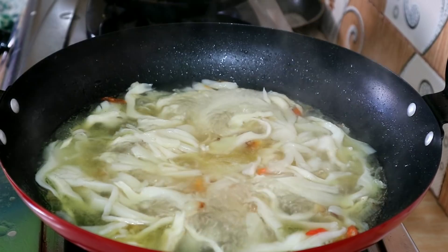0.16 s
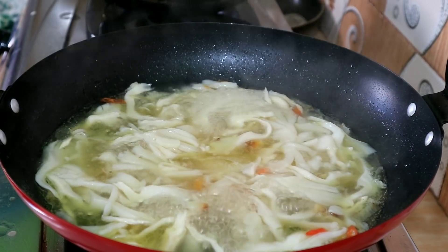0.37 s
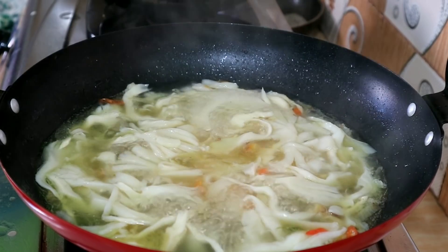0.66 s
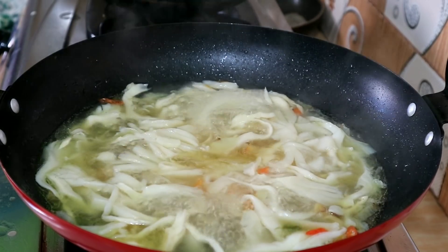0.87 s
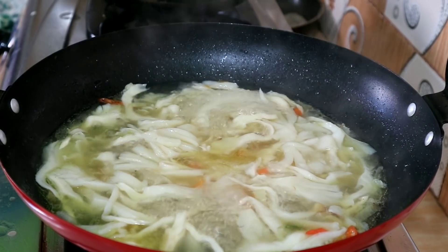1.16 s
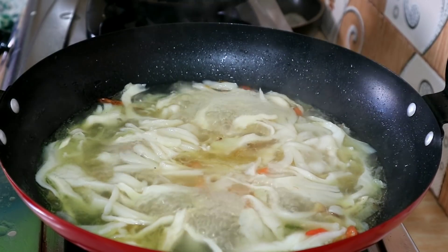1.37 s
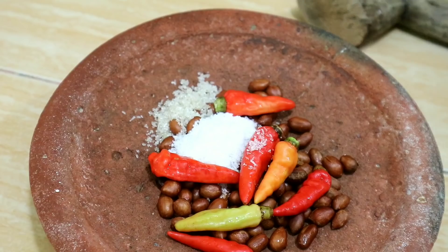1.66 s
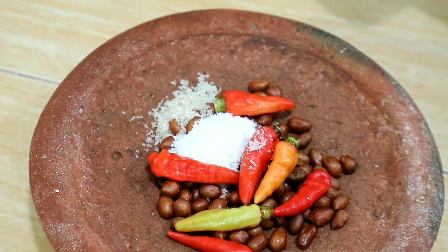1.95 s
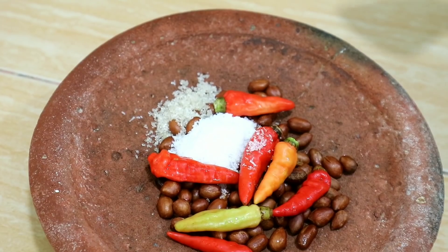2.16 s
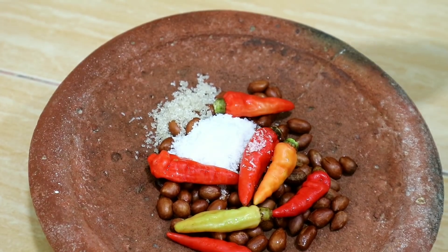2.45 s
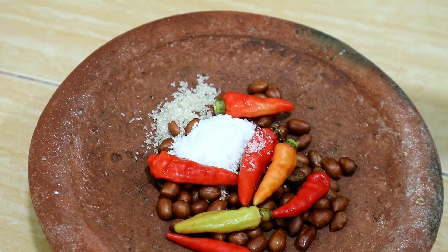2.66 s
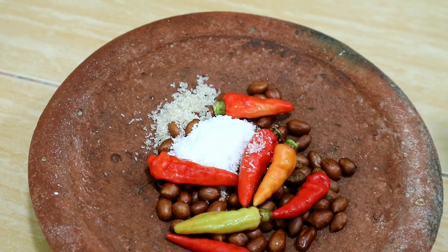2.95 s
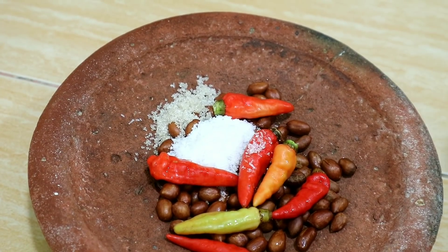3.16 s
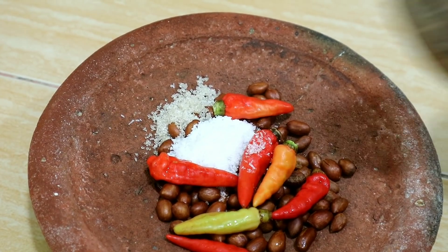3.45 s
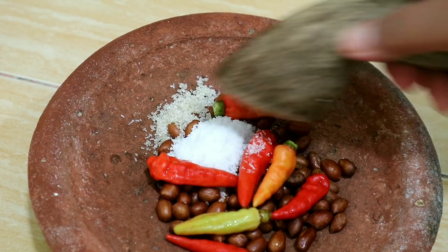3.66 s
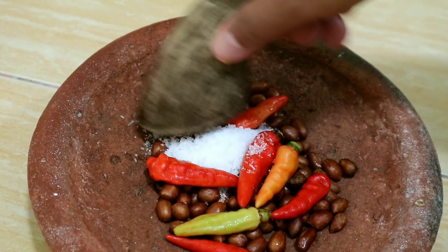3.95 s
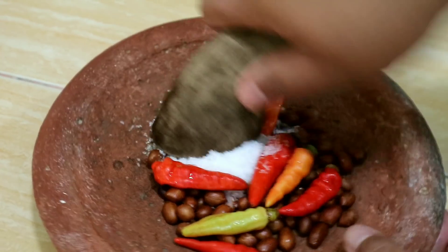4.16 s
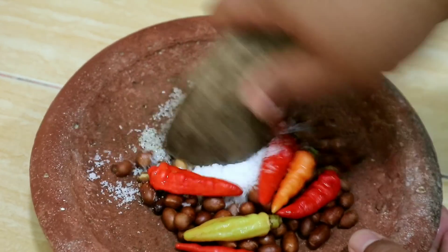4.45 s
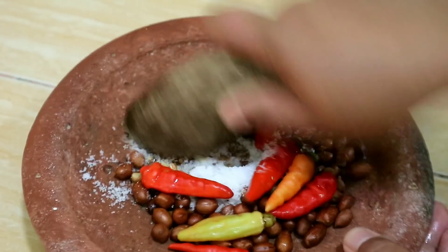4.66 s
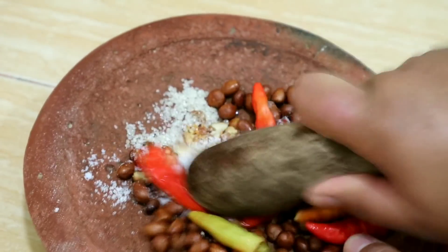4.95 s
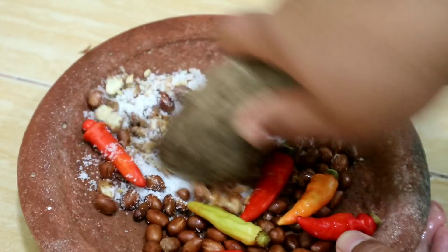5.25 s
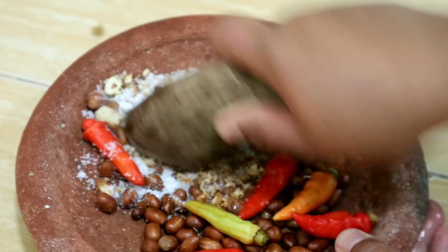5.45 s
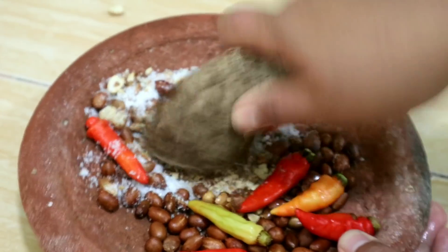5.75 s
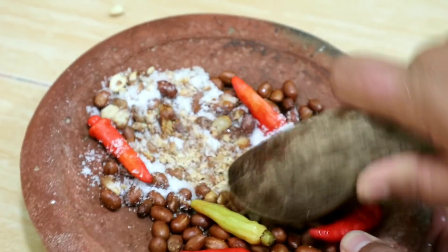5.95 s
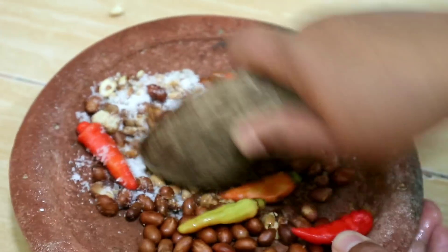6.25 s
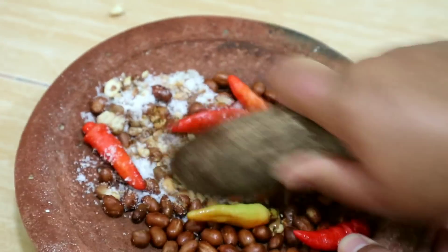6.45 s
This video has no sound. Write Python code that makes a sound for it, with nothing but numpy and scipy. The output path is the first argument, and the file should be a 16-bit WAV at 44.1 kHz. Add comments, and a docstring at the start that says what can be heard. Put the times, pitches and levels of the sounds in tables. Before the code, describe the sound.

From 0 to 1.7 seconds a wok of noodles simmers faintly: a low, uneven throbbing boil, soft steam hiss and scattered bubble pops, one sharper near 1.1. At 1.7 the simmer cuts out and water swells in quickly, a steady bright splash like a running tap into a sink, full of fine drops, with brief bubbly gushes especially between 1.9 and 3.3. Around 4.2 a pestle starts working in a clay dish, close and much louder than the water. Short gritty pushes, each under a tenth of a second, come irregularly, with hard, dry nut cracks; the strongest cluster is near 4.6, with more around 5.1 to 5.3 and 5.6 to 5.9. The clay rings briefly, salt fizzes finely, and the small tiled kitchen adds a short echo. Grinding grows sparser after 5.9, continuing to the end at about 6.7 over unbroken water.

```python
"""A wooden pestle grinds peanuts, salt and chillies in a clay dish: short gritty pushes and cracking nuts,
random fractures and snaps driving the dish's resonances. Behind it noodles simmer in a wok, shaped noise
with a few pops; then water splashes steadily, as from a running tap: coloured drops and noise with gushes."""
import sys
import numpy as np
from scipy import signal
from scipy.fft import rfft, irfft, next_fast_len
from scipy.io import wavfile
from scipy.ndimage import uniform_filter1d, map_coordinates

SR = 44100
rng = np.random.default_rng(int(sys.argv[2]) if len(sys.argv) > 2 else 0)


def generate_wav(signal):
    """Clip the signal to [-1, 1] and save it as 16-bit WAV at the path in sys.argv[1]."""
    frames = np.transpose(np.atleast_2d(signal))
    scaled = np.clip(frames, -1, 1) * 32767
    pcm = np.round(scaled).astype(np.int16)
    wavfile.write(sys.argv[1], SR, pcm)


N = 291501

WATER_START_S = 1.686  # the wok gives way to the water

# Spectrum of the coarse splash. Each row: frequency in Hz, relative level in dB per Hz.
SPLASH_COLOUR = [(25, -48), (70, -40), (160, -19), (230, -23), (310, -16.5), (420, -22), (620, -13),
                 (1050, -11), (1600, -8), (1900, -5.5), (2300, -1), (3000, -5), (4500, -20.5), (9000, -51)]
# Pushes of the pestle. Each row: start in s, end in s, level in dB (both ears' power summed, before the room),
# brightness in dB, place on the dish (-1 to 1).
PUSHES = [(4.17, 4.226, -27.5, -6.5, 0.18), (4.42, 4.489, -20, -1, 0.089), (4.553, 4.613, -18, -4, 1),
          (4.732, 4.807, -19, -1.5, 0.15), (4.851, 4.881, -21.5, 3.5, .7), (5.092, 5.14, -22.5, 1.5, 0.3),
          (5.146, 5.208, -16, 0.5, -0.18), (5.264, 5.315, -18.3, -2, 0.25), (5.379, 5.424, -20, -0.5, 0.18),
          (5.47, 5.56, -19.5, -1, -0.49), (5.553, 5.607, -17, 4.5, 0.43), (5.671, 5.712, -24, -6.5, -0.24),
          (5.74, 5.815, -23, 0.5, -.65), (5.816, 5.897, -21.5, -1.5, -0.27), (5.956, 5.99, -25.5, 6, -.2),
          (6.163, 6.193, -25, -7, -0.46), (6.243, 6.285, -24, 0.5, 0.28), (6.291, 6.382, -21, -0.5, -0.33),
          (6.468, 6.542, -27.5, -3.5, -0.048)]


def amp(db):
    """Decibels to gain."""
    return 10 ** (np.asarray(db) / 20)


def unit(x):
    """Scale to rms 1."""
    return x / np.sqrt(np.mean(x ** 2) + 1e-20)


def along(points, hz):
    """Read (Hz, value) points on a log frequency axis."""
    f, v = np.transpose(points)
    return np.interp(np.log(hz + 1), np.log(f + 1), v)


def wobble(rate_hz, size=N):
    """Smooth random curve through rate_hz knots a second."""
    knots = rng.standard_normal(int(size * rate_hz / SR) + 4)
    return map_coordinates(knots, [np.arange(size) * rate_hz / SR])


def sides(pan_db):
    """Left and right gains for a left-minus-right level."""
    pan_db = np.atleast_1d(pan_db)
    return amp(np.array([pan_db, -pan_db]) / 2)


def add(track, s, sound):
    """Mix a sound into a track at s seconds."""
    part = track[..., max(round(s * SR), 0):][..., :sound.shape[-1]]
    part += sound[..., :part.shape[-1]]


def filtered(x, response):
    """Multiply the spectrum of x by a function of frequency."""
    n = x.shape[-1]
    m = next_fast_len(n + SR // 4)
    return irfft(rfft(x, m) * response(np.fft.rfftfreq(m, 1 / SR)), m)[..., :n]


def band(x, centre_hz, octaves):
    """Keep a bell-shaped band about a pitch."""
    return filtered(x, lambda hz: np.exp(-.5 * (np.log2((hz + 1) / centre_hz) / octaves) ** 2))


def grains(shape, rate_hz, spread_db):
    """Random impulses of either sign, rate_hz a second, their sizes spread in dB."""
    hit = rng.random(shape) < rate_hz / SR
    sign = np.sign(rng.standard_normal(shape))
    size = amp(spread_db * np.clip(rng.standard_normal(shape), -2, 2))
    return unit(hit * sign * size)


def stereo(pair, colour, alike, phase, pan):
    """Colour two unrelated signals and place them between the ears by likeness, phase and level."""
    def ears(hz):
        turn = np.arccos(np.clip(along(alike, hz), -1, 1)) / 2
        lead = np.exp(.5j * along(phase, hz) * np.array([[1], [-1]]))
        mix = np.array([[np.cos(turn), np.cos(turn)], [np.sin(turn), -np.sin(turn)]])
        return mix * lead * sides(along(pan, hz)) * amp(along(colour, hz))
    return unit(filtered(pair[:, None], ears).sum(0))


def patchy(x, depth_db):
    """Random patches of gain in time and frequency."""
    z = signal.stft(x, nperseg=256)[2]
    field = uniform_filter1d(rng.standard_normal(z.shape[1:]), size=5, axis=0)
    field = uniform_filter1d(field, size=9, axis=1)
    return signal.istft(z * amp(depth_db * unit(field)), nperseg=256)[1][:, :N]


def kitchen(x, wet_db):
    """A sound with the tiled room's short answer, decaying noise drawn anew per call and ear."""
    # Each row: frequency in Hz, t60 in s.
    decay = [(200, 0.41), (2000, 0.48), (10000, 0.097)]
    hz, t, z = signal.stft(rng.standard_normal((2, SR // 5)), SR, nperseg=256)
    tail = signal.istft(z * amp(-60 * t / along(decay, hz)[:, None]), SR, nperseg=256)[1]
    wet = amp(wet_db) * tail / np.linalg.norm(tail[0])
    response = np.pad(wet, ((0, 0), (SR // 300, 0)))
    response[:, 0] = 1  # direct sound
    return signal.fftconvolve(x, response, axes=1)


def boil():
    """Steam bubbles throb under the noodles: low noise with slow wavering and large heaves."""
    # Boil spectrum. Each row: frequency in Hz, relative level in dB per Hz.
    colour = [(25, -32), (60, -38), (100, -14), (150, -3), (200, -6), (270, -15), (600, -54), (1500, -90)]
    # Large steam bubbles heaving. Each row: centre in s, lift above the boil in dB.
    heaves = [(.5, 6), (.72, 3), (1.1, 4.5), (1.23, 5), (1.42, 1)]
    heave_sigma_s = 0.041
    now = np.arange(N) / SR
    level_db = -49.5 + 1.6 * wobble(15.95)
    for s, lift_db in heaves:
        level_db += lift_db * np.exp(-.5 * ((now - s) / heave_sigma_s) ** 2)
    noise = rng.standard_normal((2, N))
    return amp(level_db) * stereo(noise, colour, [(150, 0.94)], [(150, -1.03)], [(150, -7.0)])


def steam():
    """Steam hisses at the surface: noise and sparse impulses in random patches."""
    # Steam spectrum. Each row: frequency in Hz, relative level in dB per Hz.
    colour = [(25, -29), (200, -18), (330, -8), (450, -11.5), (700, -10.5), (1200, -9.5), (1450, -13.5),
              (2700, -15), (5000, -19), (10800, -23.5), (15000, -39)]
    noise = rng.standard_normal((2, N)) + .5 * grains((2, N), rate_hz=900, spread_db=4.5)
    fizz = patchy(noise, depth_db=2.0)
    alike = [(400, 0.086), (1800, 0.3), (4000, .12)]
    pan = [(300, -4.0), (700, -3.0), (9000, -2.5)]
    level_db = -43.5 + wobble(8)
    return amp(level_db) * stereo(fizz, colour, alike, [(1000, 0.34)], pan)


def pops():
    """Bubbles burst on the broth: decaying noise in a band about each pitch."""
    # Each row: start in s, peak level in dB (before panning), pitch in Hz, t60 in s.
    bursts = [(.002, -28.5, 2690, 0.18), (.146, -33.5, 140, .12), (.53, -38, 1400, 0.11),
              (.812, -37.5, 397, 0.096), (.85, -36, 1170, .16), (.965, -34.5, 360, 0.064),
              (.984, -31, 1600, .09), (1.103, -23.5, 1580, 0.01), (1.189, -33.5, 3000, 0.39),
              (1.38, -32, 1550, .05), (1.642, -34.5, 350, .17), (1.646, -29.5, 780, .14),
              (1.655, -30, 2800, .12)]
    out, t = np.zeros((2, N)), np.arange(SR // 6) / SR
    for s, peak_db, hz, t60_s in bursts:
        noise = rng.standard_normal(len(t)) + 2.3 * rng.standard_normal((2, len(t)))  # part shared by the ears
        pop = band(noise * amp(-60 * t / t60_s), hz, octaves=0.49)
        add(out, s, amp(peak_db) * pop / np.abs(pop).max())
    return out * sides(-5.0)


def wok():
    """Boil, steam and pops, faded out as the water starts."""
    fade_s = 0.017
    fade = np.clip((WATER_START_S - np.arange(N) / SR) / fade_s + 1, 0, 1)
    return (boil() + steam() + pops()) * fade


def drops(rate_hz, patchy_db):
    """Crackling single drops over a noise blur of far ones, in random patches."""
    # Power share of single drops. Each row: frequency in Hz, share (0 to 1).
    drop_share = [(500, 0.05), (1100, 0.19), (2000, 0.77), (4000, 0.46), (7000, 0.2), (12000, 0.35)]
    share = lambda hz: np.clip(along(drop_share, hz), 0, 1)
    near = filtered(grains((2, N), rate_hz, spread_db=2.5), lambda hz: np.sqrt(share(hz)))
    far = filtered(rng.standard_normal((2, N)), lambda hz: np.sqrt(1 - share(hz)))
    return patchy(near + far, depth_db=patchy_db)


def basin(x):
    """The hollow of the sink lifts a few narrow bands of the splashing."""
    # Each row: centre in Hz, width in Hz, lift in dB.
    hollows = [(359, 16, 5.5), (377, 18, 6), (456, 15, 11), (714, 18, 6), (820, 22, 0), (1790, 35, 0)]
    def lift(hz):
        return amp(sum(db / (1 + (2 * (hz - centre) / width) ** 2) for centre, width, db in hollows))
    return filtered(x, lift)


def stream():
    """Thousands of drops: coarse splash through the basin and finer spray, both swelling in."""
    # Spray spectrum. Each row: frequency in Hz, relative level in dB per Hz.
    spray_colour = [(100, -37.5), (1000, -23.5), (2000, -12), (3000, -3.5), (3650, -2), (4500, -4.5),
                    (5100, -9), (6500, -14.5), (8000, -19), (10000, -25.5), (12500, -34.5), (15000, -44.5)]
    # Between the ears. Each row: frequency in Hz, likeness (0 to 1).
    alike = [(100, 0.5), (650, 0.78), (1400, 0.7), (2500, 0.12), (5000, 0.15), (9000, 0.2)]
    # Each row: frequency in Hz, left's phase lead in radians.
    phase = [(100, -0.6), (350, 0.53), (1000, 1.19), (1400, 1.5), (2500, 2.5), (8000, 2.5)]
    # Each row: frequency in Hz, left minus right in dB.
    pan = [(150, -1.5), (400, -5), (800, 0), (2000, -2), (4000, -1), (10000, -1)]
    # The stream slowly eases and gains strength. Each row: time in s, level change in dB.
    strength = [(1.8, 0.3), (2.3, 0.3), (3.1, 0), (3.55, -.4), (4.2, 1.5), (5.0, 0.95), (6.4, 1.1)]
    age_s = np.maximum(np.arange(N) / SR - WATER_START_S, 0)
    flutter_db, wander_db = 0.59, 0.4  # fast and common; slow and per layer
    stream_db = np.interp(WATER_START_S + age_s, *np.transpose(strength)) + flutter_db * wobble(55)

    def swell(db, time_constant_s):
        return amp(db + stream_db + wander_db * wobble(9)) * (1 - np.exp(-age_s / time_constant_s))

    splash = stereo(drops(rate_hz=1700, patchy_db=0.93), SPLASH_COLOUR, alike, phase, pan)
    spray = stereo(drops(rate_hz=2600, patchy_db=1.4), spray_colour, alike, phase, pan)
    return basin(swell(-26.5, 0.1) * splash) + swell(-22.5, 0.11) * spray


def gushes():
    """The stream plunges into standing water: a band of bubble impulses and a broad slosh swell and fade."""
    # Each row: start in s, length in s (peak at a third), pitch in Hz, rms level at the peak in dB (before panning).
    plunges = [(1.91, .1, 3600, -25.5), (1.97, 0.045, 2720, -22.5), (2.106, 0.11, 2400, -22),
               (2.17, 0.19, 1520, -31.5), (2.29, 0.12, 2480, -22), (2.51, .06, 2300, -36),
               (2.67, 0.091, 3500, -24.5), (2.72, 0.11, 2150, -23), (2.92, 0.1, 3450, -22.5),
               (2.98, 0.065, 1650, -20.5), (3.303, 0.064, 3170, -21), (3.825, .085, 2270, -25),
               (4.159, 0.075, 1770, -20.5), (4.249, 0.069, 1470, -28), (5.952, 0.065, 1780, -26.5),
               (6.06, 0.074, 2400, -25), (6.147, .08, 2150, -23.5)]
    slosh_db = -5  # against the bubbles
    out = np.zeros((2, N))
    for s, length_s, hz, db in plunges:
        u = np.arange(SR // 3) / SR / (length_s / 3)
        cloud = band(grains((2, len(u)), rate_hz=1700, spread_db=2.5), hz, octaves=0.3)
        slosh = filtered(rng.standard_normal((2, len(u))), lambda f: amp(along(SPLASH_COLOUR, f)))
        gush = unit(unit(cloud) + amp(slosh_db) * unit(slosh))
        add(out, s, amp(db) * u * np.exp(1 - u) * gush * sides(-1.8))
    return out


def water():
    """The steady stream and its gushes."""
    return stream() + gushes()


def dish(place, thud_db, bright_db, fizz_db, size=4096):
    """The clay dish's stereo impulse response; where the pestle bears decides which modes speak."""
    # Modes. Each row: frequency in Hz, width in Hz, level in dB, extra dB at place 1, left minus right in dB.
    modes = [(151.7, 28, -14.5, -3, -6), (362, 72, -11.5, 0, -16.5), (483, 77, -10, 0, -14.5),
             (711, 87, -5.5, -5.5, 6.5), (978, 100, -5.5, 1.5, -14.5), (1130, 100, -5.5, -4, -19),
             (1264, 145, 1, 4.5, -2.5), (1454, 55, -1.5, -6, 1), (3250, 210, 6.5, -7.5, -2),
             (3720, 154, 2.5, 8, -9.5), (4537, 104, 2, -8.5, -5.5), (6360, 300, -13, 16, -1)]
    # The grit's own crunch. Each row: frequency in Hz, level in dB per Hz.
    crunch = [(25, -49), (90, -30), (250, -25.5), (600, -11), (850, -21), (1700, -9), (2900, -22),
              (4300, -38), (5500, -12), (8000, -17), (11000, -23), (15000, -58)]
    hz = np.fft.rfftfreq(size, 1 / SR)
    power = amp(along(crunch, hz)) ** 2 * sides(-0.48) ** 2
    for centre, width, db, swing_db, pan_db in modes:
        centre = centre * (1 + 0.0088 * rng.standard_normal())  # the pestle's load detunes the clay a little
        peak = (hz * width) ** 2 / ((centre ** 2 - hz ** 2) ** 2 + (hz * width) ** 2)
        power = power + (amp(db + swing_db * place) * sides(pan_db)) ** 2 * peak ** 1.2
    tilt_points = [(170, thud_db), (300, 0), (1500, 0), (3000, bright_db), (5000, bright_db), (8000, fizz_db)]
    magnitude = np.sqrt(power) * amp(along(tilt_points, hz))
    # minimum phase: the clay rings after each contact, never before
    cepstrum = irfft(np.log(magnitude + 1e-6))
    cepstrum[:, 1:size // 2] *= 2
    cepstrum[:, size // 2 + 1:] = 0
    return irfft(np.exp(rfft(cepstrum)))


def cracks():
    """A nut breaks with one snap and a run of smaller splits, ringing the dish; each push also snaps a chip."""
    # Whole nuts giving way. Each row: start in s, peak level in dB (before the room), brightness in dB.
    nuts = [(4.197, -6, 5.5), (4.397, -8, 6), (4.457, -8, -1), (4.566, -5, 12), (4.578, -7, -2),
            (4.5915, -3, -14), (4.6015, 0, -3.5), (4.749, -6.5, 12), (4.776, -4.5, -1), (4.866, -8.5, 6),
            (5.106, -9, 16), (5.151, -3.5, 4), (5.181, -2, -2), (5.201, -6, -2), (5.2605, -2.5, 5),
            (5.293, -2, 5), (5.578, -4, 1), (5.71, -12, 8), (5.744, -4.5, 16), (5.844, -5.5, 17),
            (5.863, -10, 0), (6.178, -9, 3), (6.268, -13, 0), (6.317, -9, -14)]
    out, t = np.zeros((2, N)), np.arange(SR // 50) / SR
    start, end, push_db, push_bright_db, places = np.transpose(PUSHES)
    chip_s = start + (end - start) * rng.random(len(start))
    chip_db = push_db + 8 + 1.5 * rng.standard_normal(len(start))
    for s, peak_db, bright_db in [*nuts, *zip(chip_s, chip_db, push_bright_db)]:
        place = np.interp(s, (start + end) / 2, places)  # where the pestle then bears
        splits = 0.31 * grains(len(t), rate_hz=4500, spread_db=0.5) * amp(-60 * t / 0.01)
        splits[0] = 1  # the main snap
        response = dish(place, 0, bright_db, fizz_db=bright_db - 9.0)
        snap = signal.fftconvolve(splits[None], response, axes=1)
        add(out, s, kitchen(amp(peak_db) * snap / np.abs(snap).max(), wet_db=-12.0))
    return out


def pushes():
    """Each push sticks and slips over the grit, crushing it in clumps of tiny fractures."""
    # Fine fizz as the pestle passes into and out of the salt. Each row: time in s, level in dB.
    salt_fizz = [(4.45, -1), (4.75, -12), (5.13, 5), (5.42, -8.5), (5.95, -5), (6.25, 3.5), (6.5, -8)]
    thud_start_db, thud_growth_db_per_s = -3, 5.5  # as the nuts flatten, the pestle bears more heavily
    lead_s = .012  # added at each end: the pestle bears down and lifts gradually
    out = np.zeros((2, N))
    coarse = lambda hz: 1 / np.sqrt(1 + (hz / 4500) ** 6)
    fine = lambda hz: np.sqrt(1 - coarse(hz) ** 2)
    for start, end, db, bright_db, place in PUSHES:
        n = round((max(end - start, .01) + 2 * lead_s) * SR)
        thud_db = thud_start_db + thud_growth_db_per_s * (start - PUSHES[0][0])
        fizz_db = np.interp((start + end) / 2, *np.transpose(salt_fizz))
        slips = unit(amp(2.8 * np.clip(wobble(159.5, size=n), -1.3, 1.3)))
        # coarse crumbs drive the clay in bursts, fine salt adds an even fizz
        crumbs = filtered(slips * grains(n, rate_hz=1100, spread_db=2.5), coarse)
        salt = filtered(rng.standard_normal(n), fine)
        force = signal.windows.tukey(n, .5) * (crumbs + salt)
        scrape = signal.fftconvolve(force[None], dish(place, thud_db, bright_db, fizz_db), axes=1)
        scrape *= np.sqrt(2 * n / np.sum(scrape ** 2))  # rms 1 over the push
        add(out, start - lead_s, kitchen(amp(db - 3) * scrape, wet_db=-6.5))  # -3 dB: two ears
    return out


def scene():
    """The wok, then the water with the grinding close in front of it."""
    return wok() + water() + cracks() + pushes()


def record(dry):
    """Clip at full scale, then cut everything from the band limit up."""
    top_hz = 15330
    return filtered(np.clip(dry, -1, 1), lambda hz: hz < top_hz)


dry = scene()
out = record(dry)
generate_wav(out)
```